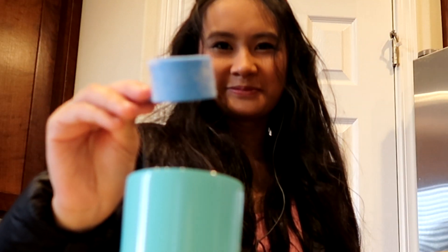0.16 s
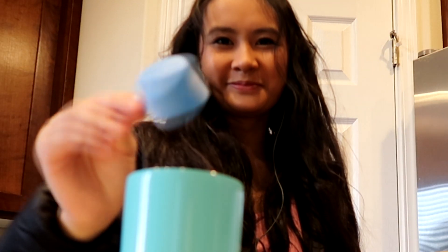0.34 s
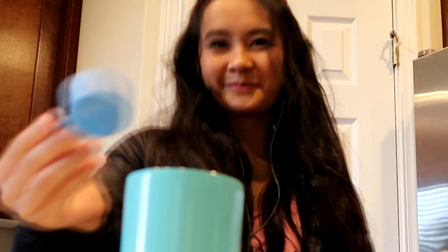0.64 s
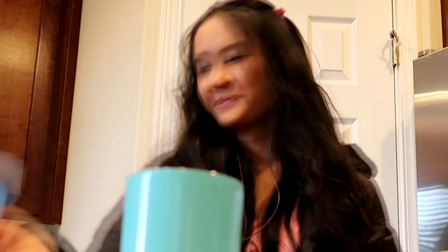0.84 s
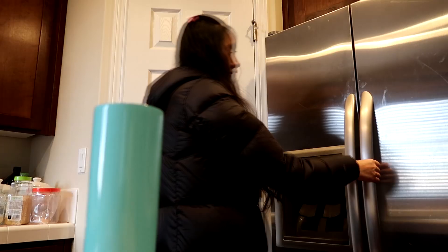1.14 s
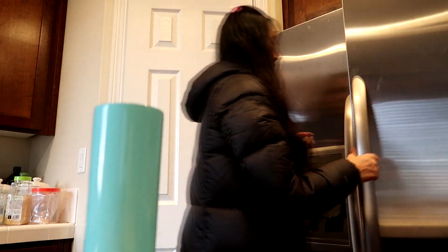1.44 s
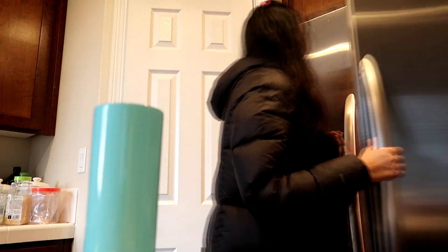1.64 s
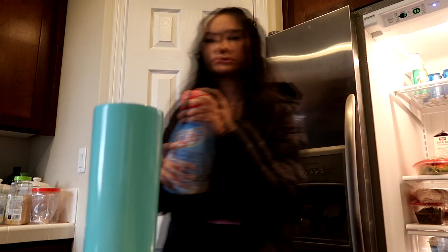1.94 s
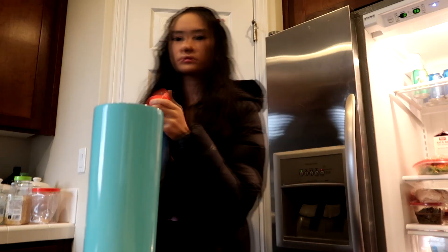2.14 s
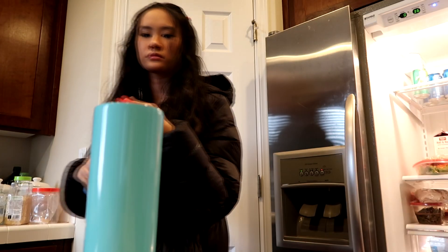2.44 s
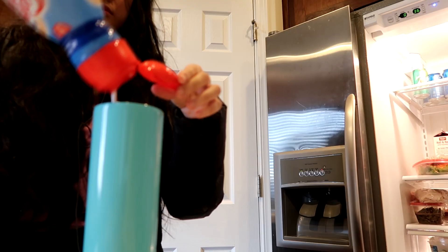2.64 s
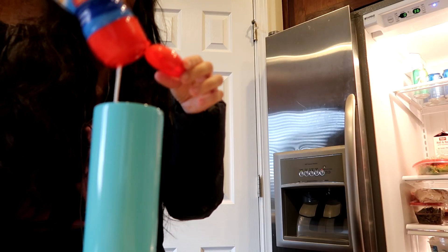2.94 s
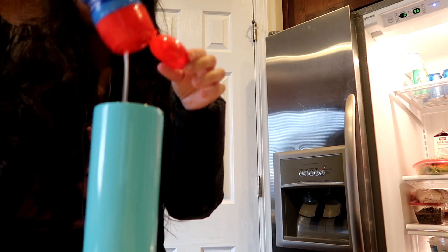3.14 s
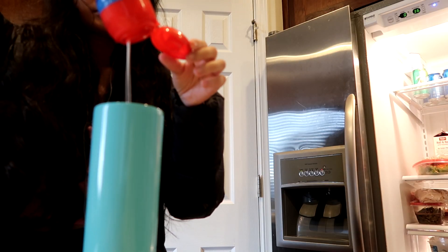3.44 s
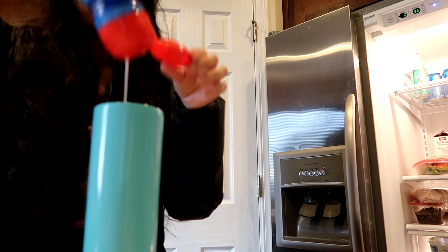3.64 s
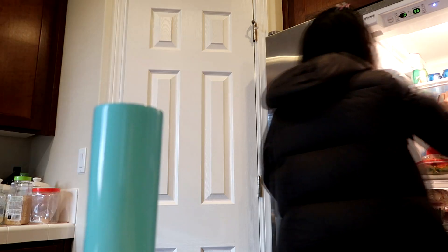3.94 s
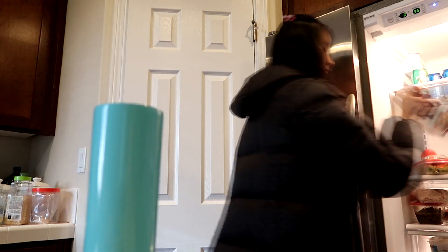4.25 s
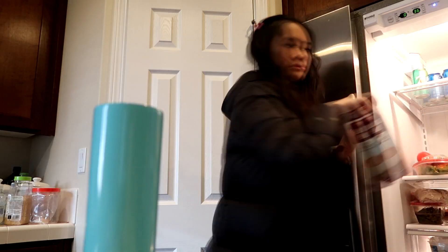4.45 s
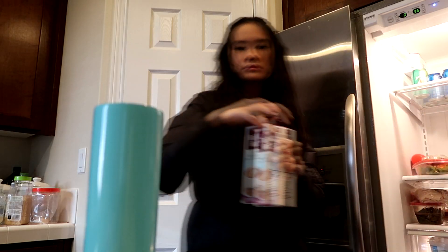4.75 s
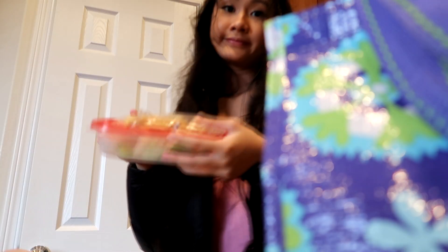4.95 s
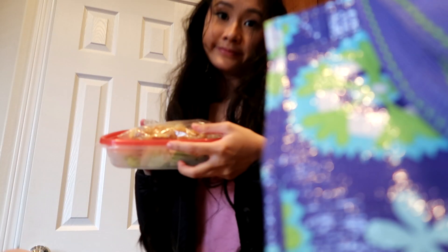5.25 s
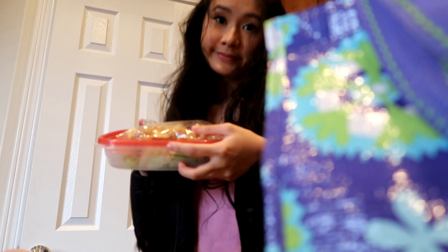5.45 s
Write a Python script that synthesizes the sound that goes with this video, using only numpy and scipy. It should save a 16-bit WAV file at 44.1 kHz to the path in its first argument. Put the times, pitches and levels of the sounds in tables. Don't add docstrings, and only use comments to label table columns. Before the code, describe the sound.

A fridge door peels open with a thump and shudder, a plastic flip cap snaps, then bottle and carton knock and scrape in a quiet kitchen.

```python
import sys
import numpy as np
from scipy import signal
from scipy.fft import rfft, irfft, next_fast_len
from scipy.io import wavfile
from scipy.ndimage import map_coordinates

SR = 44100
rng = np.random.default_rng(int(sys.argv[2]) if len(sys.argv) > 2 else 0)


def unload_wav(signal):
    wavfile.write(
        sys.argv[1],
        SR,
        np.round(np.clip(np.atleast_2d(signal).T, -1, 1) * 32767).astype(np.int16),
    )


def attenuation_scalar(level_db):
    decades = np.asarray(level_db, float) / 20
    return 10 ** decades


N = 246468
T = np.arange(N) / SR


def unit(x):
    return x / np.sqrt(np.mean(x ** 2) + 1e-20)


def along(points, hz):
    f, v = np.transpose(points)
    return np.interp(np.log(hz + 1), np.log(f + 1), v)


def wobble(rate):
    return map_coordinates(rng.standard_normal(int(N * rate / SR) + 4), [T * rate])


def filtered(x, response):
    m = next_fast_len(x.shape[-1] + SR // 2)
    return irfft(rfft(x, m) * response(np.fft.rfftfreq(m, 1 / SR)), m)[..., :x.shape[-1]]


def coloured(x, spectrum):
    return unit(filtered(x, lambda hz: attenuation_scalar(along(spectrum, hz))))


def resonant(x, modes):
    def response(f):
        total = 0
        for k, (centre, width, db) in enumerate(modes):
            damping = 1j * f * width
            total = total + (-1) ** k * attenuation_scalar(db) * damping / (centre * centre - f * f + damping)
        return total
    return unit(filtered(x, response))


def gliding(x, times, centre_hz, width, lift_db):
    hz, t, z = signal.stft(x, SR, nperseg=512)
    away = np.log((hz[:, None] + 1) / np.interp(t, times, centre_hz)) / width
    return unit(signal.istft(z * attenuation_scalar(lift_db * np.exp(-away ** 2)), SR, nperseg=512)[1][:N])


def diffuse(pair, alike):
    def turn(hz):
        return np.arccos(np.clip(along(alike, hz), -1, 1)) / 2
    mid, side = filtered(pair, lambda hz: np.array([np.cos(turn(hz)), np.sin(turn(hz))]))
    return np.array([mid + side, mid - side])


def grit(rate, spread_db, smooth):
    size = attenuation_scalar(spread_db * np.minimum(rng.exponential(size=N), 2.5))
    slips = (rng.random(N) < rate / SR) * size * rng.standard_normal(N)
    return unit(slips) + smooth * rng.standard_normal(N)


def ring(hz, t60, t, attack):
    return np.sin(2 * np.pi * hz * t) * attenuation_scalar(-60 * t / t60) * (1 - np.exp(-t / attack))


def burst(spectrum, t60, t, attack):
    return coloured(rng.standard_normal(len(t)), spectrum) * attenuation_scalar(-60 * t / t60) * (1 - np.exp(-t / attack))


def strokes(rows, fall_db_per_s):
    total = 0
    for s, db, rise, hold in rows:
        falling = np.clip(T - s - rise - hold, 0, None)
        total = total + attenuation_scalar(db - fall_db_per_s * falling) * np.clip((T - s) / rise, 0, 1) ** 2
    return total


def add(track, s, x):
    track[..., round(s * SR):round(s * SR) + x.shape[-1]] += x


# start t/s, drone level/dB, low rumble level/dB, compressor level/dB
VIEWS = [
    (0, -46, -56, -65),
    (1.203, -45.5, -41.5, -50),
    (1.976, -44.5, -43.5, -53.5),
    (2.606, -45.5, -43, -52.5),
    (3.809, -42, -41.5, -50.5),
    (4.843, -43.5, -50.5, -41),
]
# starting level/dB, drift/(dB/s)
JACKET_MOVES = [
    (-56.5, 2),
    (-48, -8),
    (-49.5, -5),
    (-53, -4.5),
    (-51.5, 1.5),
    (-51.5, -6),
]
# f/Hz, width/Hz, level/dB
HUM = [(63.3, 4.3, 0), (200.9, 5.9, -2.5), (300, 10, -18), (404, 5.9, -13.5)]
# f/Hz, level/dB per Hz
DRONE = [(12, -58), (20, -26), (26, -19), (55, -10), (133, -7.5), (162, -11.5), (181, -11), (282, -7),
         (316, -5.5), (583, -18), (689, -17.5), (2280, -27.5), (12900, -47.5), (14800, -52), (15600, -58)]
# f/Hz, level/dB per Hz
CLOTH = [(530, -13), (900, -6.5), (1080, -3.5), (1180, -3.5), (1330, -7.5), (3270, -6.5), (12300, -23),
         (15600, -35)]
# f/Hz, left-right likeness/1
ALIKE = [(60, 0.9998), (130, 0.95), (290, 0.85), (640, 0.54), (1410, 0.49), (3100, 0.33), (6820, -0.29),
         (12000, -0.53), (15000, -0.3)]


def kitchen():
    start, *levels = np.transpose(VIEWS)
    view = np.searchsorted(start[1:], T)
    drone, rumble, motor = attenuation_scalar(levels)[:, view]
    air = diffuse(coloured(rng.standard_normal((2, N)), DRONE), ALIKE) * attenuation_scalar(-0.5 + 0.29 * wobble(4.03))
    hum = resonant(rng.standard_normal(N), HUM[1:]) * motor * attenuation_scalar(-2.5)
    low = resonant(rng.standard_normal(N), HUM[:1]) * rumble * attenuation_scalar(-5.0)
    fabric = coloured(np.array([grit(3000, 0.84, 1.65), grit(3000, 2.2, 1.08)]), CLOTH)
    rustle_db, drift = np.transpose(JACKET_MOVES)[:, view]
    jacket_db = rustle_db + drift * (T - start[view]) + 1.0 + 1.26 * wobble(27.02)
    jacket = diffuse(fabric, ALIKE) * attenuation_scalar(jacket_db)
    whine_db = -80 + 2.5 * np.sin(9.1 * T) * np.sin(23.3 * T)
    screen_hz = 13006
    whine = attenuation_scalar(whine_db) * np.sin(2 * np.pi * screen_hz * T + .6 * np.sin(61 * T))
    return drone * air + hum + low + jacket + whine


# f/Hz, t60/s
WALLS = [(100, 0.3), (250, 0.46), (600, 0.53), (2500, 0.45), (8000, 0.59), (14000, 0.2)]
# f/Hz, left-right likeness/1
ECHO_ALIKE = [(60, 1.0), (130, 1.0), (290, 1.0), (640, 0.97), (1410, 0.98), (3100, 0.94), (6820, 0.14),
              (15000, -0.35)]
# f/Hz, level/dB
REFLECT = [(60, 2.5), (130, -5), (250, -5), (400, 0.5), (3000, -4), (8000, 3.5), (12000, 7), (15500, 5.5)]


def walls(x):
    hz, t, z = signal.stft(rng.standard_normal((2, SR // 2)), SR, nperseg=256)
    decaying = z * attenuation_scalar(-60 * t / along(WALLS, hz)[:, None])
    tail = diffuse(signal.istft(decaying, SR, nperseg=256)[1], ECHO_ALIKE)
    age = np.arange(tail.shape[1]) / SR
    tail *= 1 - np.exp(-age / 0.00086)
    tail *= 0.8 + np.exp(-age / 0.012)
    tail = filtered(tail / np.linalg.norm(tail[0]), lambda hz: attenuation_scalar(along(REFLECT, hz)))
    return signal.fftconvolve(x, tail, axes=1)[:, :N]


# t/s, level/dB, half length/s
SWISH = [
    (0.017, -56, 0.044),
    (1.14, -48, 0.16),
    (1.556, -45, 0.014),
    (1.748, -47, 0.019),
    (2.11, -49, 0.056),
    (4.532, -44.5, 0.026),
    (4.625, -46, 0.0068),
    (4.64, -50, .04),
    (5.056, -56, 0.0089),
    (5.214, -49.5, 0.2),
]
# f/Hz, level/dB per Hz
SLEEVE = [(880, -10), (1500, -5), (2180, -3), (5420, -11), (8420, -18.5), (12200, -17.5), (15600, -34)]


def sleeve():
    swell = sum(attenuation_scalar(db) * np.exp(-((T - s) / half) ** 2) for s, db, half in SWISH)
    nylon = coloured(np.array([grit(3000, 2.0, 2.5), grit(3000, 2.2, 0.97)]), SLEEVE)
    return swell * diffuse(nylon, ALIKE)


# t/s, peak level/dB, f/Hz, t60/s
HEAVES = [
    (1.292, -19, 48, .12),
    (1.33, -19, 52, .1),
    (1.365, -24, 45, .08),
]


def heave():
    out = np.zeros(N)
    for s, db, hz, t60 in HEAVES:
        add(out, s, attenuation_scalar(db) * ring(hz, t60, T[:SR // 3], 0.0036))
    return out


# t/s, level/dB, rise/s, hold/s
RUBS = [
    (-.01, -55, .01, .004),
    (.21, -54, 0.03, 0.028),
    (.28, -48.5, 0.016, 0.0098),
    (.36, -55.5, .025, .03),
    (.44, -66, .03, .04),
]
# f/Hz, width/Hz, level/dB
SCOOP = [(2340, 130, 0.5), (2690, 140, 3), (3000, 50, -7), (4530, 330, -14)]


def scoop():
    return strokes(RUBS, fall_db_per_s=250) * resonant(grit(370, 4.3, 0.81), SCOOP)


# f/Hz, level/dB per Hz
RAP = [(350, -20), (600, -9), (695, -18), (944, -6.5), (1240, -46), (1630, -14.5), (3250, -15.5),
       (9000, -39.5), (11700, -80), (19800, -120)]
# f/Hz, level/dB per Hz
FIZZ = [(3240, -54), (5500, -0.5), (9750, -15.5), (11600, -4), (12600, -5), (15600, -20)]


def knock(db, ring_hz, body_db, body_hz, crack_db):
    t = T[:SR // 8]
    neighbours = sum(ring(ring_hz * np.exp(rng.normal(0, 0.17)), 0.012, t, 0.00033) for _ in range(4))
    rings = attenuation_scalar(-4.5) * (ring(ring_hz, 0.024, t, 0.0018) + 0.26 * neighbours)
    crack = attenuation_scalar(crack_db + 1.5) * burst(RAP, .03, t, .0016)
    fizz = attenuation_scalar(crack_db + 0.2 * db - 16) * burst(FIZZ, 0.011, t, 0.00025)
    hollow = ring(body_hz, 0.054, t, 0.0019) + 0.47 * ring(body_hz * 1.283, 0.037, t, 0.00067)
    return attenuation_scalar(db) * (rings + crack + fizz + attenuation_scalar(body_db + 1.5) * hollow)


# t/s, scrape level/dB, hold/s, scrape resonance f/Hz, rumble level/dB
DRAGS = [
    (3.856, -37.5, 0.038, 1180, -28),
    (3.94, -31.5, 0.037, 1280, -29.5),
    (4.099, -46, 0.11, 1300, -37),
    (4.242, -42, 0.052, 940, -56),
    (4.376, -34, 0.03, 1830, -21.5),
    (4.45, -35, 0.019, 2600, -21.5),
    (4.541, -45, 0.037, 1620, -28.5),
    (4.621, -39.5, 0.05, 1540, -28),
    (4.688, -42, 0.025, 1020, -36),
    (4.772, -39, 0.011, 870, -35),
]
# f/Hz, level/dB per Hz
SCRAPE = [(290, -18), (500, 10.5), (1100, -2.5), (1640, 1.5), (1870, -1), (2850, -2), (3100, -5.5),
          (9000, -38), (11700, -60), (19800, -120)]
# f/Hz, width/Hz, level/dB
SHELF = [(141, 49, 3.5), (219, 63, 7), (300, 63, 8), (394, 56, 1), (482, 71, -4.5)]
# t/s, ring level/dB, ring f/Hz,
# hollow body over ring level/dB
HANDLE_AND_TAPS = [
    (1.220, -16, 910, -34),
    (1.446, -10.5, 950, 3.5),
    (1.744, -42, 950, -3),
    (2.024, -49, 3000, 20),
    (3.546, -40.5, 3060, 4),
    (5.045, -37, 2150, -1),
    (5.354, -30.5, 980, -17),
]
# t/s, ring level/dB, ring f/Hz, hollow body over ring level/dB
BOTTLE = [
    (3.872, -30.5, 840, 6.5),
    (3.884, -20.5, 804, 4.5),
    (3.950, -11, 1270, -9),
    (3.954, -5.5, 2040, -18),
    (3.965, -12.5, 1366, -11),
    (4.104, -27, 890, -6),
    (4.253, -28.5, 1800, -4),
    (4.283, -25, 795, -1),
    (4.294, -40, 802, 9),
]
# t/s, ring level/dB, ring f/Hz, hollow body over ring level/dB
CARTON = [(4.373, -21.5, 1970, -1), (4.3885, -0.5, 1950, -14), (4.401, -19, 2130, -7),
          (4.429, -19.5, 1910, 1.5), (4.471, -14, 920, 1), (4.499, -15.5, 920, -6), (4.562, -16, 1660, -8),
          (4.618, -26, 2840, -1), (4.636, -23.5, 1600, -5), (4.653, -24, 1220, -13),
          (4.671, -23, 870, -1.5), (4.689, -24.5, 920, 3), (4.755, -17.5, 3440, 2.5),
          (4.757, -10.5, 877, 3.5), (4.831, -16, 820, -11)]
# knocks, hollow body f/Hz, crack over ring on a faint knock level/dB, crack lost per dB of ring
OBJECTS = [
    (HANDLE_AND_TAPS, 250, -16, 0.24),
    (BOTTLE, 387, -5.5, -0.1),
    (CARTON, 318.5, -17, 0.29),
]
# t/s, peak level/dB, f/Hz, t60/s
BUMPS = [(3.878, -22, 443, 0.079), (3.954, -9.5, 348, 0.039), (3.962, -14, 521, 0.051),
         (4.012, -25, 377, 0.061), (4.393, -14, 332, 0.16), (4.412, -14, 310, .04),
         (4.468, -18, 383, 0.086), (4.573, -26, 320, 0.054), (4.654, -17, 332, 0.038),
         (4.672, -19.5, 437, 0.061), (4.686, -17, 394, 0.043), (4.72, -21, 420, .04),
         (4.731, -19, 380, 0.047), (4.7608, -1, 345, 0.041), (4.804, -9.5, 289, 0.041),
         (3.9565, -12, 650, 0.011), (1.345, -18, 532, .07), (.22, -46, 467, 0.16), (.33, -44.5, 473, .15),
         (4.82, -23, 345, 0.069), (4.282, -22.5, 645, 0.036), (4.782, -17, 302, .05)]
# t/s, peak level/dB, f/Hz, t60/s
TINGS = [(3.952, -28, 2120, 0.014), (3.975, -23, 1400, .05), (4.373, -26, 1810, 0.022),
         (4.4, -24, 2100, .03), (4.562, -37, 1650, .05), (4.562, -29, 4300, .012), (4.618, -30, 4320, .015),
         (4.756, -21, 3240, 0.015), (1.279, -10.5, 1230, .03), (1.268, -19, 2400, .03),
         (1.447, -21, 1500, .02), (1.452, -23.5, 2495, .02), (1.458, -28, 3510, 0.019),
         (1.325, -21, 980, .03), (1.33, -19, 1520, .04), (1.358, -20, 1780, 0.026), (1.372, -28, 1930, .03),
         (4.389, -21, 2760, 0.017), (4.389, -13, 1930, .016), (4.41, -34, 1920, .08),
         (4.44, -34, 2280, 0.027), (4.466, -25, 3470, .02), (4.47, -27, 2600, .012),
         (4.47, -22, 950, 0.025), (4.5, -30, 2200, .02), (4.56, -24, 2810, 0.022), (4.575, -30, 1550, .04),
         (4.632, -29, 1300, .02), (4.648, -31, 1640, .04), (4.665, -29, 1760, .03), (4.69, -30, 2900, .02),
         (4.69, -35, 3390, .02), (4.7216, -28, 1060, .02), (4.776, -29, 1236, 0.052),
         (4.795, -23.5, 764, .04), (4.8, -34, 2860, 0.037), (4.69, -30, 1900, .012),
         (4.513, -28, 1000, .015), (4.6, -33, 1400, .015), (4.832, -28, 1460, .02),
         (3.952, -33, 13000, 0.011), (4.756, -40, 11950, .01), (5.047, -44, 13000, .008),
         (5.047, -44, 5000, 0.0076), (5.055, -48, 11500, 0.0066), (5.355, -33, 3200, .01),
         (4.757, -24.5, 2550, 0.049), (5.354, -38, 890, 0.01)]


def shelves():
    s, scrape_db, hold, tone_hz, rumble_db = np.transpose(DRAGS)
    rise = np.full(len(s), 0.018)
    until_last_view = T < VIEWS[-1][0]
    scrape = strokes(zip(s, scrape_db, rise, hold), fall_db_per_s=213) * until_last_view
    rumble = strokes(zip(s, rumble_db, rise, hold), fall_db_per_s=213) * until_last_view
    friction = gliding(coloured(grit(1500, 2.5, 1.2), SCRAPE), s + rise, tone_hz, width=.18, lift_db=8)
    out = scrape * attenuation_scalar(0.6 + 2.9 * wobble(35)) * friction
    out += rumble * attenuation_scalar(-4 + 1.5 * wobble(25)) * resonant(grit(300, 2.2, 1.2), SHELF)
    out = np.pad(out, (0, SR))
    for rows, body_hz, crack_db, loss in OBJECTS:
        for s, db, ring_hz, body_db in rows:
            spot_hz = body_hz * np.exp(0.1 * rng.normal())
            add(out, s, knock(db, ring_hz, body_db, spot_hz, crack_db - loss * db))
    for rows, attack in ((BUMPS, .0015), (TINGS, .0005)):
        for s, db, hz, t60 in rows:
            add(out, s, attenuation_scalar(db) * ring(hz, t60, T[:SR // 5], attack))
    return out[:N]


# t/s, level/dB, rise/s, hold/s
CHATTER = [
    (2.255, -33, .003, 0.018),
    (2.292, -32, .003, 0.03),
    (3.951, -28.5, 0.0026, 0.013),
    (4.469, -38, 0.0026, 0.028),
    (4.757, -46, 0.0027, 0.02),
]
# f/Hz, level/dB per Hz
CLATTER = [(500, -18), (1000, -1), (2000, 1), (3500, -5), (5000, -5.5), (8000, -16.5), (12000, -25),
           (15600, -40)]


def chatter():
    pair = coloured(np.array([grit(2500, 3.0, 0.63), grit(2500, 2.4, 1.0)]), CLATTER)
    return strokes(CHATTER, fall_db_per_s=296) * diffuse(pair, ECHO_ALIKE)


# t/s, crack level/dB, knock level/dB, knock f/Hz
CAP = [
    (2.0517, -25.5, -1.5, 460),
    (2.2547, -9.5, -5, 518),
    (2.2617, -15.5, 1, 257),
    (2.2701, -16, -8, 286),
    (2.2804, -19, -13, 444),
    (2.2917, -5, -21, 684),
    (2.2974, -13.5, -6.5, 268),
    (2.3835, -23, 3, 282),
]
# t/s, peak level/dB, f/Hz, t60/s
LID = [(2.052, -21, 3000, 0.0075), (2.2548, 6.5, 675, 0.0063), (2.258, -26, 2100, .06),
       (2.2935, -12.5, 540, 0.018), (2.2548, -13.5, 2200, 0.017), (2.2545, -14, 3950, 0.013),
       (2.281, -15, 1940, 0.018), (2.2915, -13, 4900, 0.018), (2.2904, -24.5, 2570, 0.12),
       (2.2915, -15, 3600, 0.013), (2.383, -9.5, 2650, 0.018), (2.3825, -16, 3260, 0.017),
       (2.3825, -35, 5100, .015), (2.398, -36, 5190, 0.046), (2.405, -29, 2640, 0.046),
       (2.432, -30, 2600, .03), (2.394, -32, 2700, 0.04), (2.3, -32, 4950, .04), (2.318, -30, 5200, .04),
       (2.262, -32, 6200, 0.011), (2.2545, -28, 13000, .004), (2.262, -30, 11500, .004),
       (2.2915, -26, 14000, .004), (2.298, -23, 9700, 0.0035), (2.298, -30, 6300, .003),
       (2.384, -30, 9300, 0.0045)]
# f/Hz, level/dB per Hz
CRACK = [(350, -20), (600, -2), (1300, -5.5), (2100, 0.5), (3200, -1.5), (5000, -8), (7000, -54),
         (10000, -75)]


def cap():
    out, t = np.zeros(N), T[:SR // 6]
    for s, db, knock_db, knock_hz in CAP:
        neck = ring(knock_hz, 0.031, t, 0.00038) + 0.19 * ring(knock_hz * 1.69, 0.028, t, 0.0011)
        crack = attenuation_scalar(-9.0) * burst(CRACK, 0.031, t, 0.00014)
        fizz = attenuation_scalar(-12.5 + 0.25 * db) * burst(FIZZ, 0.0087, t, 0.00022)
        add(out, s, attenuation_scalar(db) * (crack + fizz + attenuation_scalar(knock_db + 6.0) * neck))
    for s, db, hz, t60 in LID:
        add(out, s, attenuation_scalar(db) * ring(hz, t60, t, 0.00051))
    return out


# t/s, level/dB, rise/s, hold/s
SEAL = [
    (1.206, -29, 0.007, 0.036),
    (1.245, -24, 0.02, 0.067),
    (1.32, -26.5, 0.012, 0.045),
    (1.4, -32.5, 0.0088, 0.022),
    (1.442, -22.5, 0.0088, 0.014),
    (1.535, -48, 0.01, 0.056),
]
# t/s, f/Hz
SEAL_TONE = [(1.22, 900), (1.28, 1260), (1.33, 1450), (1.37, 1880), (1.42, 1290), (1.45, 990), (1.52, 1483)]
# f/Hz, level/dB per Hz
PEEL = [(70, -8), (180, 7.5), (300, 6.5), (645, -1.5), (692, 2), (1280, -1), (1400, 0), (2700, -7.5),
        (3600, -16.5), (5000, -32), (6500, -59), (11000, -120)]
# f/Hz, level/dB per Hz
HISS = [(2350, -21), (4000, 7), (5790, -0.5), (12600, -16.5), (13500, -34), (15600, -37)]
# t/s, level/dB, rise/s, hold/s
TUGS = [
    (1.283, -11, 0.024, 0.055),
    (1.405, -15, 0.017, 0.058),
    (1.54, -26.5, 0.017, 0.021),
    (1.93, -40, 0.014, .004),
]
# f/Hz, width/Hz, level/dB
PANEL = [(86, 33, -18), (131, 10.2, -1.5), (162.4, 25, -7), (197.4, 12, -7.5), (248, 37, -9.5),
         (282, 38, -13.5), (391, 23, -18), (542, 92, -18.5)]
# t/s, peak level/dB, main f/Hz, t60/s
JOLTS = [(1.297, 2, 155, 0.11), (1.326, 4, 153.6, 0.14), (1.345, -9, 136, 0.092),
         (1.4246, -1.5, 154.4, 0.097), (1.43, 4, 156.5, 0.066), (1.4537, 3.5, 170, 0.045),
         (1.463, 7.5, 190, 0.06), (1.462, -12, 560, .05), (1.483, 0, 160, 0.073), (1.4994, -3, 223, 0.08),
         (1.527, -13, 148, 0.085), (1.548, -14.5, 224.4, 0.14), (1.758, -20.5, 142.6, 0.097),
         (1.992, -19.5, 137, 0.047), (3.827, -18, 153, 0.07), (3.858, -23.5, 245, 0.19),
         (3.953, -14.5, 210, .07), (4.387, -11.5, 151, 0.074), (4.756, 3.5, 211.6, 0.043),
         (4.757, -6.5, 140, 0.068), (4.772, -10.5, 140.4, 0.17), (4.792, -6, 199, 0.062),
         (4.781, -10, 318, 0.075), (4.8, -18.5, 372, 0.071), (5.198, -24, 500, 0.075),
         (5.235, -26.5, 458, 0.05)]


def door():
    peel = strokes(SEAL, fall_db_per_s=276)
    shudder = strokes(TUGS, fall_db_per_s=249)
    hiss = peel * attenuation_scalar(-8 - 100 * np.clip(T - TUGS[0][0], 0, None))
    slips = coloured(grit(1300, 2.4, 1.2), PEEL)
    rubber = gliding(slips, *np.transpose(SEAL_TONE), width=0.13, lift_db=2)
    out = peel * attenuation_scalar(0.5 + 1.1 * wobble(60.01)) * rubber
    out += hiss * attenuation_scalar(-9.5) * coloured(grit(2300, 4.1, 0.5), HISS)
    out += shudder * attenuation_scalar(-2.5) * resonant(grit(200, 0.54, 0.83), PANEL)
    out, t = np.pad(out, (0, SR)), T[:SR // 3]
    for s, db, hz, t60 in JOLTS:
        jolt = ring(hz, 1.05 * t60, t, 0.0021) + 0.29 * ring(hz * 1.5, t60 * 0.95, t, 0.0037)
        add(out, s, attenuation_scalar(db - 3.5) * jolt)
    return out[:N]


def ports(x, lag_s, cut_hz):
    def response(hz):
        delay = np.exp(1j * np.pi * hz * lag_s * np.array([[1], [-1]]))
        return delay * (1j * hz / (cut_hz + 1j * hz)) ** 2
    return filtered(x, response)


def scene():
    hand = ports(scoop() + cap(), lag_s=2.7e-5, cut_hz=130)
    fridge = ports(door(), lag_s=1.5e-5, cut_hz=59)
    goods = ports(shelves(), lag_s=-0.00003, cut_hz=39) * attenuation_scalar([[-.4], [.4]])
    out = hand + fridge + goods + heave() + kitchen() + sleeve()
    sent = attenuation_scalar(-5.0) * hand + attenuation_scalar(-3.5) * fridge + attenuation_scalar(-4.0) * goods
    edges = [*np.transpose(VIEWS)[0], N / SR]
    for start, end in zip(edges, edges[1:]):
        view = (T >= start) & (T < end)
        out += walls(sent * view) * view
    out += chatter()
    gap = np.min([np.abs(T - s) for s in edges[1:-1]], axis=0)
    return out * np.clip(gap / 0.0053, .05, 1)


def starved(x):
    hz, t, z = signal.stft(x.mean(axis=0), SR, nperseg=2048)
    power = np.abs(z) ** 2
    bright = power[(hz > 1500) & (hz < 8000)].sum(axis=0)
    memory = .35
    recent = signal.lfilter([1 - memory], [1, -memory], bright)
    band = (hz // 600).astype(int)
    level = np.array([power[band == b].sum(axis=0) for b in range(band.max() + 1)])
    threshold_db = np.minimum(-39 + 10 * np.log10(recent + 1e-9), -65)
    threshold_db = threshold_db + 4 * rng.standard_normal(level.shape)
    lost = (10 * np.log10(level + 1e-14) < threshold_db)[band] & (hz > 8400)[:, None]
    return x - signal.istft(z * lost, SR, nperseg=2048)[1][:N]


def band_limit(x):
    return signal.sosfilt(signal.butter(12, 15750, fs=SR, output="sos"), x)


def record(dry):
    clipped = dry / (1 + np.abs(dry) ** 16) ** (1 / 16)
    mix = starved(filtered(clipped, lambda hz: hz < 15750))
    return band_limit(mix)


dry = scene()
out = record(dry)
unload_wav(out)
```